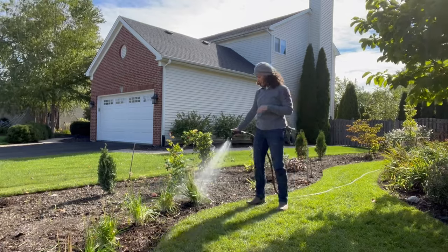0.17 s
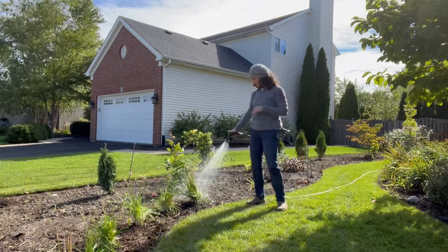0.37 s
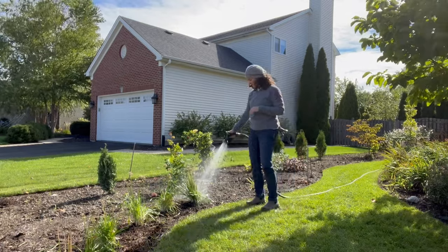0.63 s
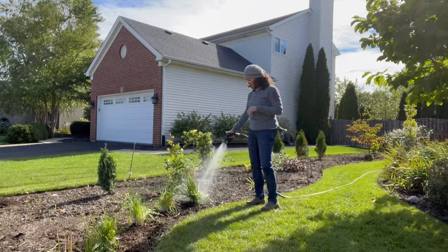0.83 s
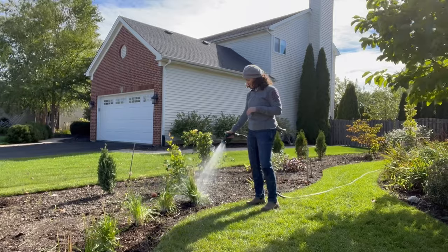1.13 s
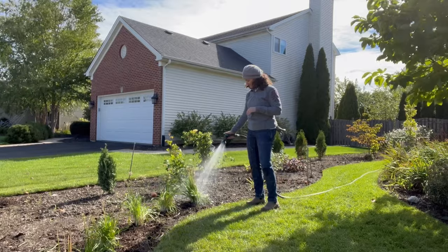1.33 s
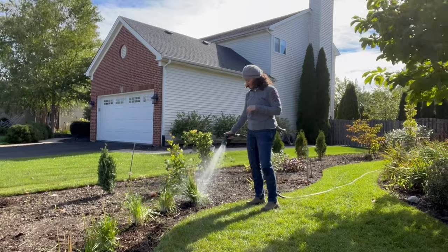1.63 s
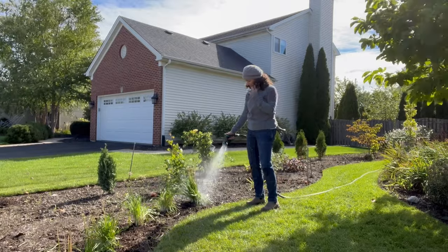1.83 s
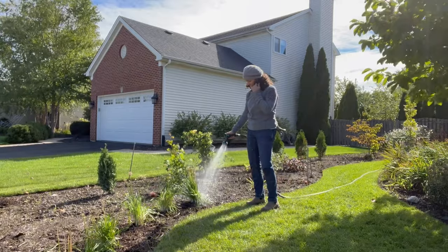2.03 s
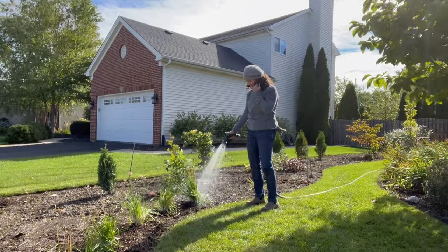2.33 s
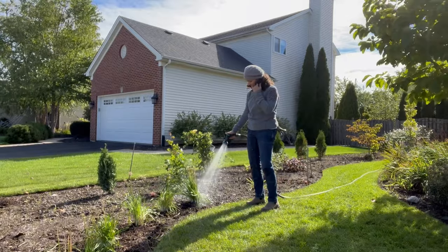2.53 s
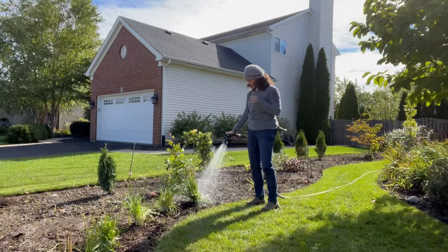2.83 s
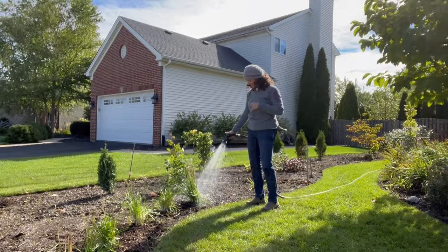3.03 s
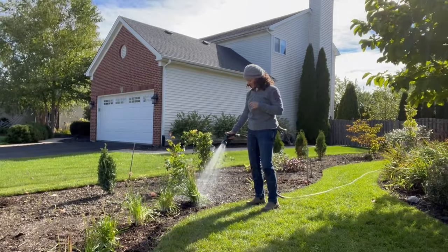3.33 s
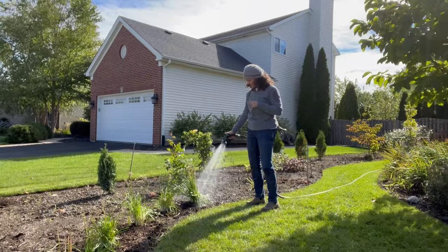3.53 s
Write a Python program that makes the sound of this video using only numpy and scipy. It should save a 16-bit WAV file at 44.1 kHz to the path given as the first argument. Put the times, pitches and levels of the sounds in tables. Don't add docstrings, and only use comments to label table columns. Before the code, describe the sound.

A hose nozzle sprays a garden bed a few metres away with a continuous airy hiss. Gusts thud and flutter on the outdoor microphone for the first two seconds, then fade, leaving spray over faint distant murmur.

```python
import sys
import numpy as np
from scipy import signal
from scipy.fft import rfft, irfft, next_fast_len
from scipy.io import wavfile
from scipy.ndimage import uniform_filter1d, map_coordinates

SR = 44100
rng = np.random.default_rng(int(sys.argv[2]) if len(sys.argv) > 2 else 0)


def persist_wave(psi):
    counts = np.round(np.clip(psi, -1, 1) * 32767).astype(np.int16)
    wavfile.write(sys.argv[1], SR, np.atleast_2d(counts).T)


def makeup_ratio(level_db):
    decades = np.asarray(level_db, float) / 20
    return 10 ** decades


N = 163170


def unit(x):
    return x / np.sqrt(np.mean(x ** 2) + 1e-20)


def noise():
    return rng.standard_normal(N)


def curves(rows, t):
    s, *columns = np.transpose(rows)
    return [np.interp(t, s, column) for column in columns]


def wobble(rate):
    knots = rng.standard_normal(int(N * 200 / SR) + 4)
    return map_coordinates(knots, [np.arange(N) * np.clip(rate, 0, 200) / SR])


def coloured(x, points):
    size = next_fast_len(N + 8192)
    hz, level_db = np.transpose(points)
    bins_hz = np.fft.rfftfreq(size, 1 / SR)
    db = np.interp(np.log(bins_hz + 1), np.log(hz + 1), level_db, right=-120)
    return unit(irfft(rfft(x, size) * makeup_ratio(db), size)[:N])


def evened(x, span_s):
    k = int(span_s * SR)
    power = uniform_filter1d(uniform_filter1d(x ** 2, k), k)
    return unit(x / np.sqrt(np.abs(power) + 1e-9))


def shaped(x, gain_db, patchy_db, quick_db):
    hz, t, z = signal.stft(x, SR, nperseg=256)

    def field(bins, frames):
        over_hz = uniform_filter1d(rng.standard_normal(z.shape), bins, 0)
        return unit(uniform_filter1d(over_hz, frames, 1))

    patches_db = patchy_db * field(4, 16) + quick_db * field(20, 3)
    z = z * makeup_ratio(gain_db(hz[:, None], t) + patches_db)
    return signal.istft(z, SR, nperseg=256)[1][:N]


def murmur():
    # time in seconds, level in dB
    wash_levels = [(0, -54.5), (.8, -55.5), (1.6, -54), (2.2, -55), (2.45, -56.5), (2.65, -52), (2.95, -55),
                   (3.25, -54.5), (3.5, -51), (3.7, -55)]
    # time in seconds, level in dB
    bough_levels = [(0, -54), (2.2, -66), (2.5, -56.5), (2.85, -56.5), (3.1, -64.5), (3.3, -79),
                    (3.45, -53), (3.7, -51)]
    # frequency in Hz, level in dB
    far_spectrum = [(15, -25), (35, 4.5), (85, -10), (200, -18), (330, -15), (600, -11), (1100, -11),
                    (2200, -26.5)]
    # frequency in Hz, level in dB
    boom_spectrum = [(180, -48), (260, -3), (330, 0.5), (430, -7), (700, -17.5), (1200, -68)]
    t = np.arange(N) / SR
    wash_db, = curves(wash_levels, t)
    boom_db, = curves(bough_levels, t)
    wash = shaped(coloured(noise(), far_spectrum), lambda hz, t: 0, patchy_db=-0.3, quick_db=0.8)
    boom = evened(coloured(noise(), boom_spectrum), span_s=0.074)
    return makeup_ratio(wash_db) * wash + makeup_ratio(boom_db) * boom


def wind():
    # time in seconds, pressure on the port in dB, eddy sharpness in dB
    gusts = [
        [(0, -37.5, -8), (.07, -32, -9.5), (.16, -29, -8.5), (.25, -27, -2), (.32, -23, -8.5), (.42, -25, -6),
         (.52, -25, -13.5), (.6, -27, -5), (.69, -29, -7)],
        [(.76, -30, 3), (.84, -28, -1), (.92, -23.5, -7), (1.01, -24, -6), (1.06, -27.5, -6), (1.12, -29, 0)],
        [(1.19, -24, -4), (1.25, -26, -2), (1.31, -26, -3.5), (1.38, -22, -14.5), (1.45, -35.5, -2.5)],
        [(1.49, -24, -7), (1.55, -24.5, -9.5), (1.595, -29, 1.5), (1.645, -19.5, -24.5), (1.69, -27.5, -3),
         (1.73, -29.5, -21), (1.78, -36.5, -6)],
        [(1.84, -34, -6), (1.95, -31, -17), (2.03, -40.5, -21), (2.22, -44.5, -26), (2.45, -48.5, -11)],
        [(3.3, -48.5, -14), (3.39, -42.5, -20), (3.46, -41, -21), (3.5, -33.5, -31), (3.58, -38.5, -17),
         (3.61, -35, -19), (3.7, -43.5, -11)],
    ]
    # frequency in Hz, level in dB
    thud_spectrum = [(14, -36), (27, -6), (45, -8), (70, -3.5), (110, -11.5), (200, -35), (600, -110)]
    # frequency in Hz, level in dB
    buffet_spectrum = [(25, 4), (60, -4.5), (105, -2.5), (150, -6.5), (260, -33.5), (700, -96)]
    # frequency in Hz, level in dB
    flutter_spectrum = [(40, -15), (130, 0.5), (200, -1.5), (300, -9.5), (500, -22), (850, -35.5),
                        (1600, -54), (4000, -120)]
    push_db, sharp_db = curves(sum(gusts, []), np.arange(N) / SR)
    lumps_db = 0.79 * wobble(21.86)

    def layer(spectrum, swing_db):
        return unit(makeup_ratio(swing_db) * evened(coloured(noise(), spectrum), span_s=0.07))

    thud = layer(thud_spectrum, lumps_db)
    buffet = layer(buffet_spectrum, lumps_db + 1.23 * wobble(14))
    flutter = layer(flutter_spectrum, lumps_db + 0.59 * wobble(15) + 1.1 * wobble(35.03))
    calm_db = -27.5
    buffet_db = 1 + 0.37 * (push_db - calm_db)
    return makeup_ratio(push_db - 3.0) * (thud + makeup_ratio(buffet_db) * buffet) + makeup_ratio(push_db + sharp_db) * flutter


def drops(count=12000):
    drops_per_s, centre_hz, spread, decay_cycles = 2500, 9860, 0.43, 3.6
    scatter_db, biggest = 2.5, 3.2
    draw = rng.random((count, 2))
    t = np.arange(40) / SR
    gaps = -np.log(1 - draw[:, 0])
    start = (np.cumsum(gaps) / drops_per_s * SR).astype(int)
    hz = centre_hz * np.exp(spread * rng.standard_normal((count, 1)))
    hz = np.clip(hz, 1500, SR / 2.3)
    size = np.tanh(-np.log(1 - draw[:, 1:]) / biggest) * biggest
    ping = makeup_ratio(scatter_db * size) * np.sin(2 * np.pi * hz * t) * np.exp(-t * hz / decay_cycles * 2)
    places = start[:, None] + np.arange(len(t))
    out = np.bincount(places.ravel(), ping.ravel(), N)[:N]
    return coloured(out, [(1000, -30), (4000, -4.5), (10000, 0), (16000, 8.5)])


def bell(hz, centre, width):
    return 1 / (1 + ((hz - centre) / width) ** 2)


def beam_db(hz, t):
    # time in seconds, beam centre in Hz, lift in dB
    beam_path = [(0, 10900, 4), (.25, 13500, 1), (.7, 12500, 1), (1.4, 11400, -1), (2.05, 12600, 2.5),
                 (2.6, 13400, 3), (2.82, 13300, 1.5), (2.92, 10000, 4), (3.2, 10600, 3), (3.55, 9600, 2),
                 (3.7, 9600, 0)]
    centre, lift_db = curves(beam_path, t)
    return lift_db * bell(hz, centre, width=750)


def echo_db(hz, t):
    # time in seconds, soil dip in Hz, body dip in Hz, body dip depth in dB
    echo_dips = [(0, 4150, 9600, 9), (.3, 4200, 10600, 7), (.6, 4150, 10700, 7), (.8, 3950, 9350, 10),
                 (1.3, 4000, 9500, 9), (1.7, 4050, 9300, 8.5), (2.1, 4050, 9030, 10.5),
                 (2.62, 4080, 9330, 9.5), (2.78, 4170, 9200, 2), (3.1, 4380, 8600, 3),
                 (3.35, 4370, 8400, 2), (3.7, 4200, 8400, 0)]
    # time in seconds, low hand dip in Hz, its depth in dB, high hand dip in Hz, its depth in dB
    hand_dips = [(0, 6900, 5, 12000, 3), (.45, 6500, 5.5, 12300, 2), (.9, 6500, 3.5, 11300, 1.5),
                 (1.5, 7000, 1.5, 11300, -2.5), (1.9, 7000, 2.5, 11200, 4.5), (2.3, 7050, 4, 11600, 1),
                 (2.75, 6740, 0.5, 11400, 7.5), (3.1, 6400, 7, 12300, 4), (3.4, 6400, 4.5, 11700, 8),
                 (3.7, 6240, 3, 10800, 8)]
    soil, body, body_db = curves(echo_dips, t)
    low, low_db, high, high_db = curves(hand_dips, t)
    samples = np.minimum((t * SR).astype(int), N - 1)
    soil = soil + 30 * wobble(9.37)[samples]
    body = body + 90 * wobble(9.37)[samples]
    hand_width_hz = 480
    soil_loss = 12 * bell(hz, soil, width=188)
    body_loss = body_db * bell(hz, body, width=430)
    body_loss = body_loss + 0.5 * body_db * bell(hz, 1.57 * body, hand_width_hz)
    hand_loss = low_db * bell(hz, low, hand_width_hz) + high_db * bell(hz, high, hand_width_hz)
    return -(soil_loss + body_loss + hand_loss)


def spray():
    # time in seconds, spray level in dB
    spray_levels = [(.2, -48.6), (.37, -51.4), (.48, -48.4), (.57, -51.3), (.66, -48.2), (.95, -49.2),
                    (1.33, -46.4), (1.68, -48.4), (1.76, -46.4), (2.1, -44.9), (2.23, -47.1), (2.34, -45.1),
                    (2.46, -47.6), (2.62, -44.6), (2.7, -46.7), (3.33, -46.6), (3.5, -43.9), (3.7, -45.8)]
    # frequency in Hz, level in dB per Hz
    fizz_spectrum = [(700, -5), (1500, -10.5), (2700, -9.5), (3500, -6.5), (5200, -4.5), (8000, -4.5),
                     (11000, -0.5), (16000, -3)]
    level_db, = curves(spray_levels, np.arange(N) / SR)
    sputter_db = 1.06 * wobble(26.38) + 0.46 * wobble(60) + 0.35 * wobble(150)
    hiss = coloured(noise(), fizz_spectrum)
    low = signal.sosfiltfilt(signal.butter(2, 4000, fs=SR, output="sos"), hiss)
    fizz = hiss - low + makeup_ratio(-3.5) * drops()
    bright = evened(fizz * makeup_ratio(sputter_db), span_s=0.058) * np.std(fizz) * makeup_ratio(level_db)
    mean_db = level_db.mean()
    steady = low * makeup_ratio(mean_db + 0.33 * (level_db - mean_db) + 3.0)
    heard = shaped(bright + steady, lambda hz, t: beam_db(hz, t) + echo_db(hz, t),
                   patchy_db=0.6, quick_db=0.45)
    return makeup_ratio(0.85) * unit(heard) * np.sqrt(np.mean(makeup_ratio(level_db) ** 2))


def scene():
    return (murmur() + wind() + spray())[None]


def low_pass(x):
    return signal.sosfilt(signal.butter(12, 17000, fs=SR, output="sos"), x)


def record(dry):
    passed = np.fft.rfftfreq(N, 1 / SR) < 15740
    mix = irfft(rfft(dry) * passed, N)
    return low_pass(mix)


dry = scene()
out = record(dry)
persist_wave(out)
```